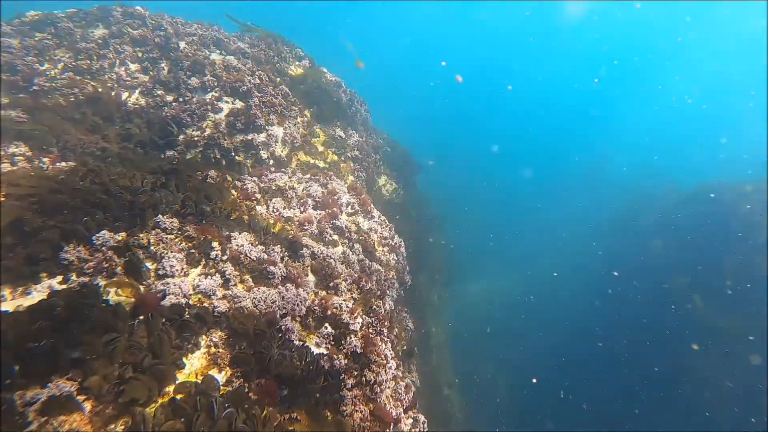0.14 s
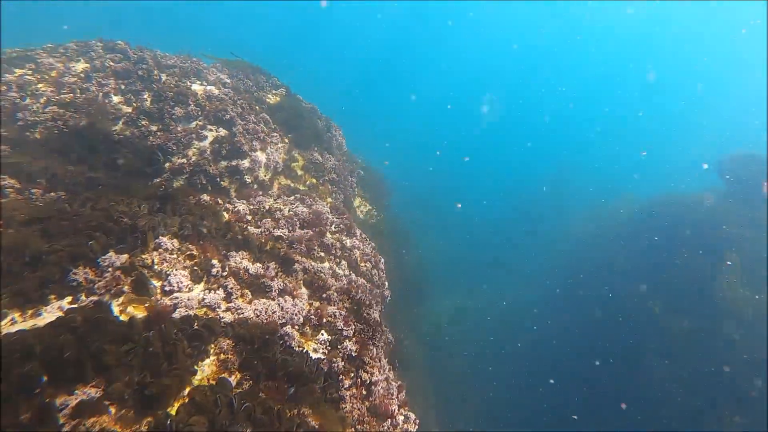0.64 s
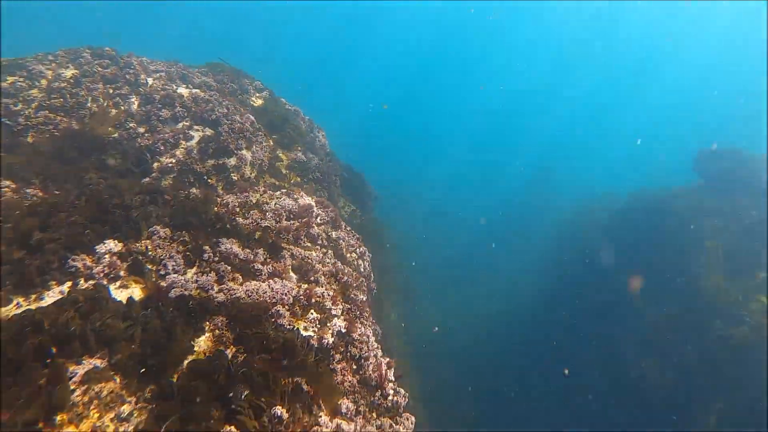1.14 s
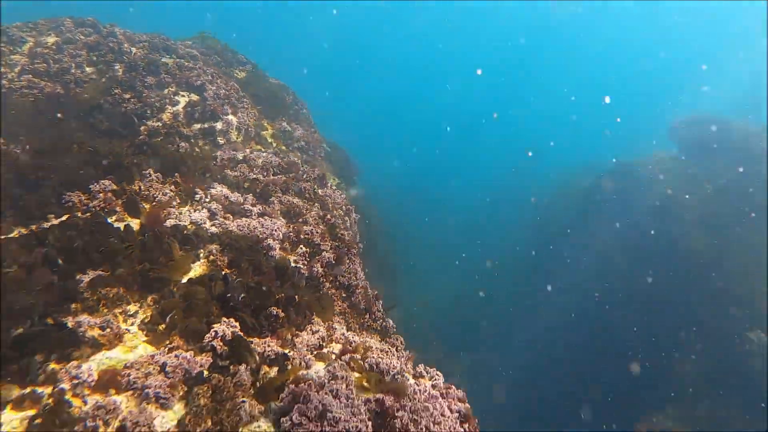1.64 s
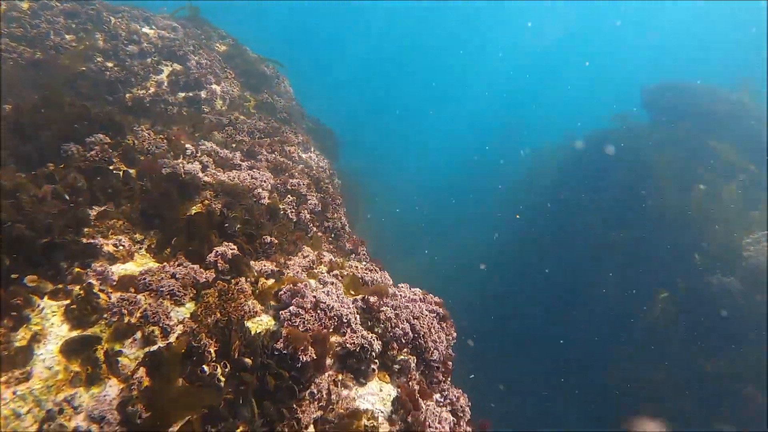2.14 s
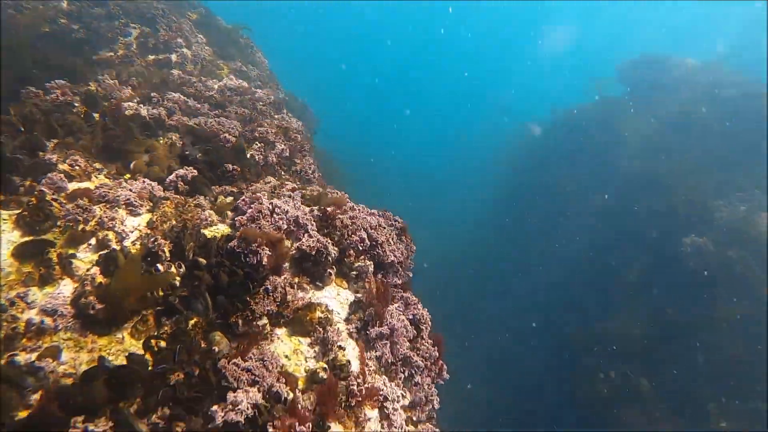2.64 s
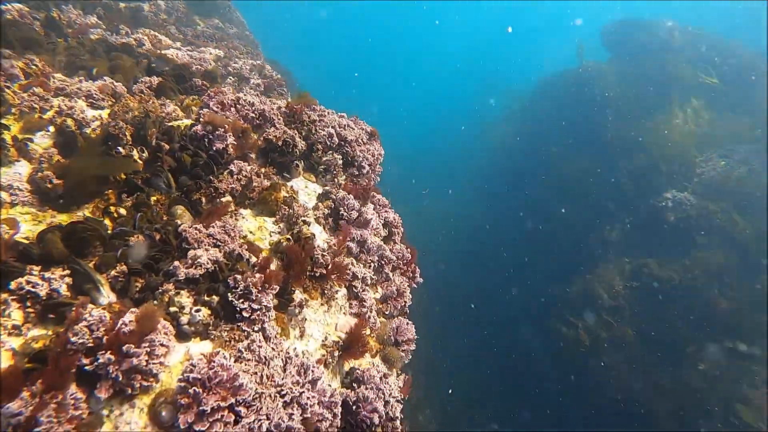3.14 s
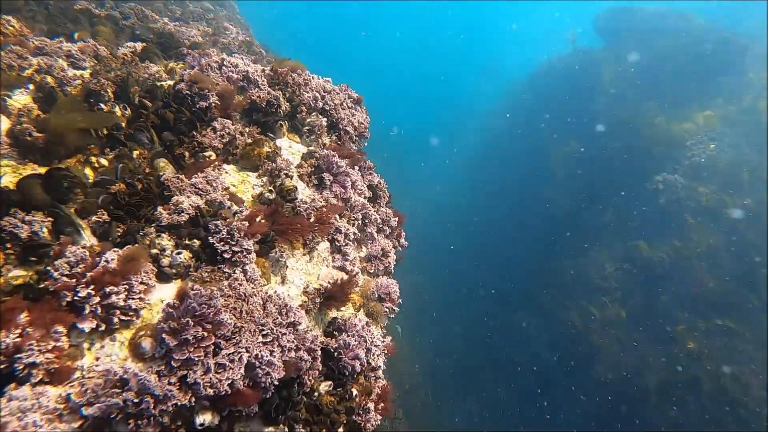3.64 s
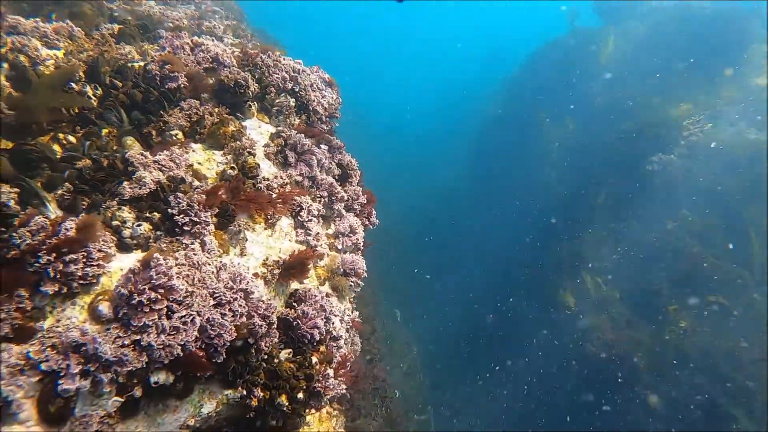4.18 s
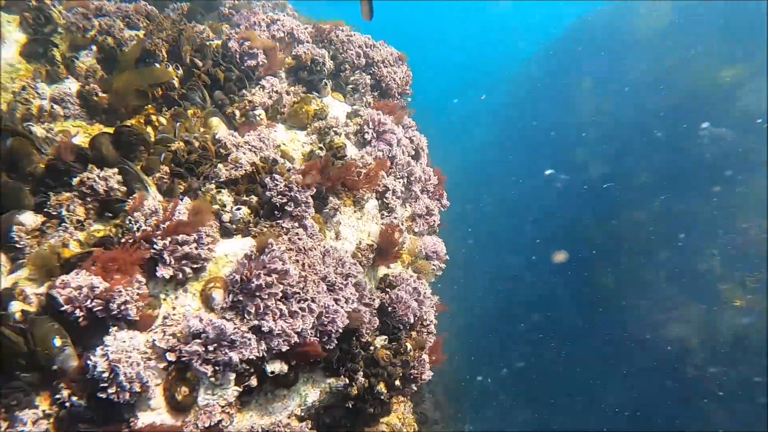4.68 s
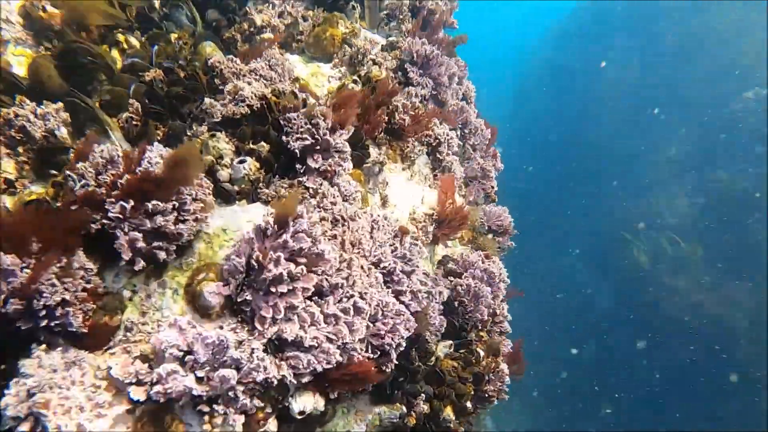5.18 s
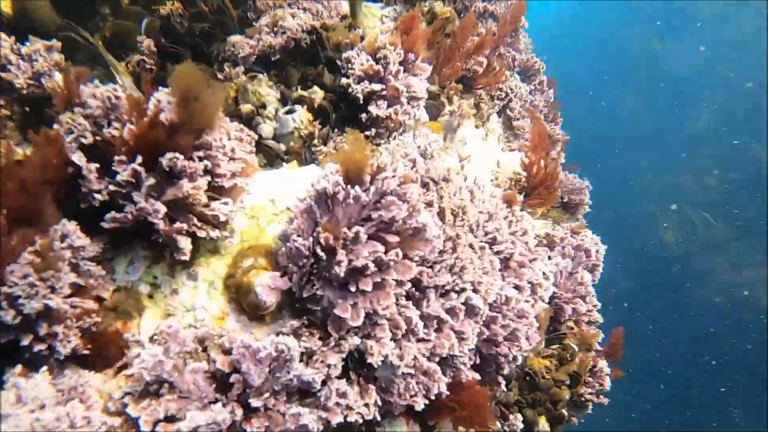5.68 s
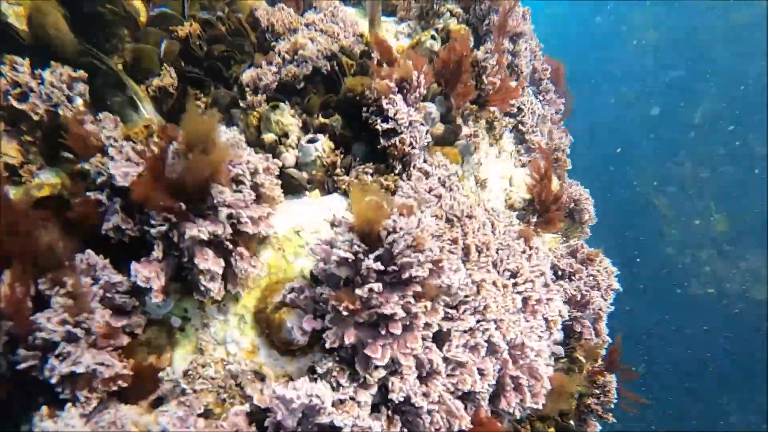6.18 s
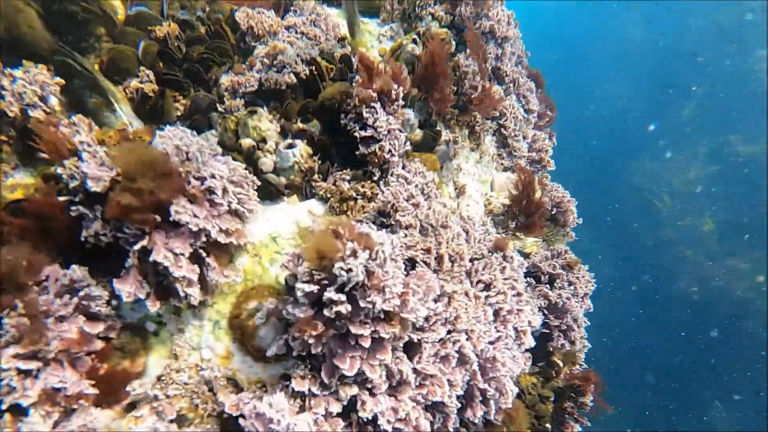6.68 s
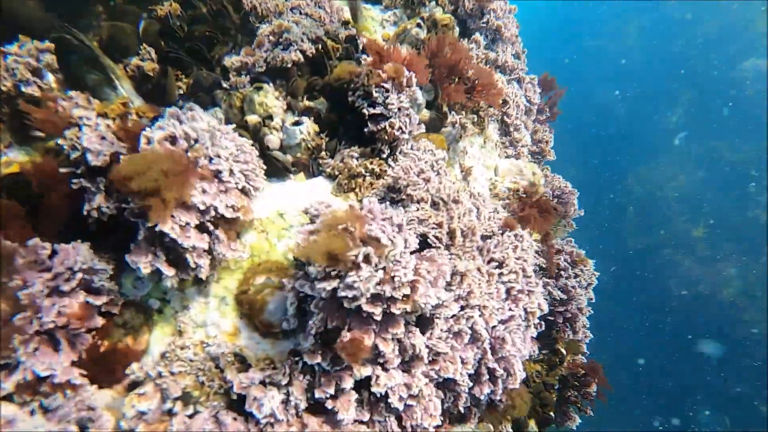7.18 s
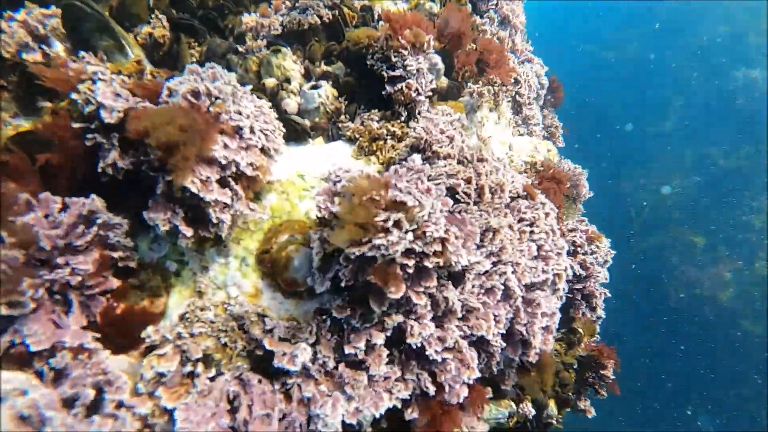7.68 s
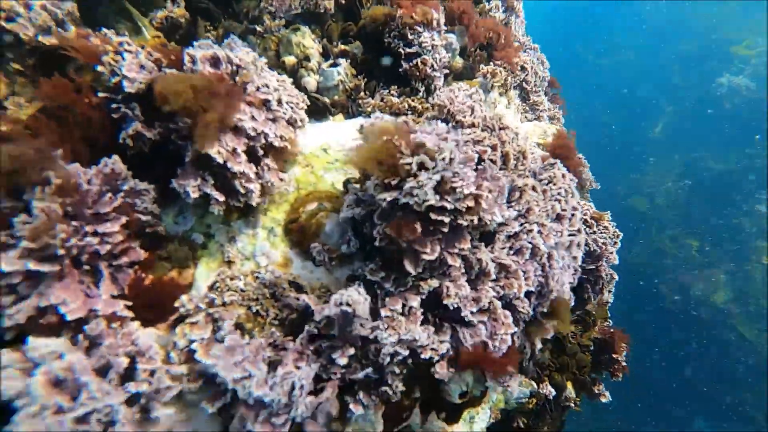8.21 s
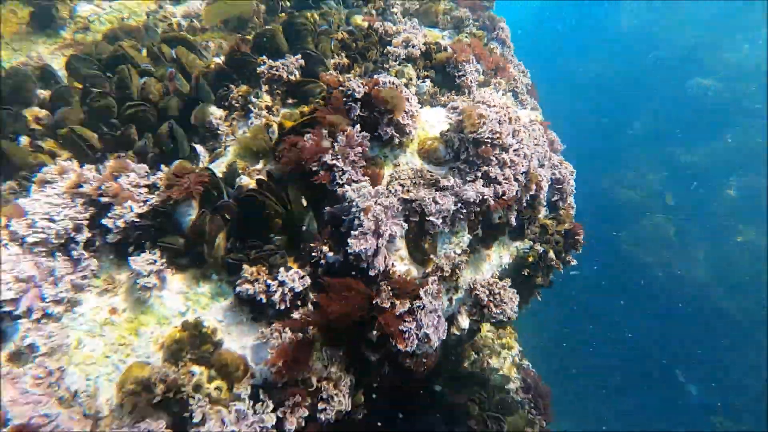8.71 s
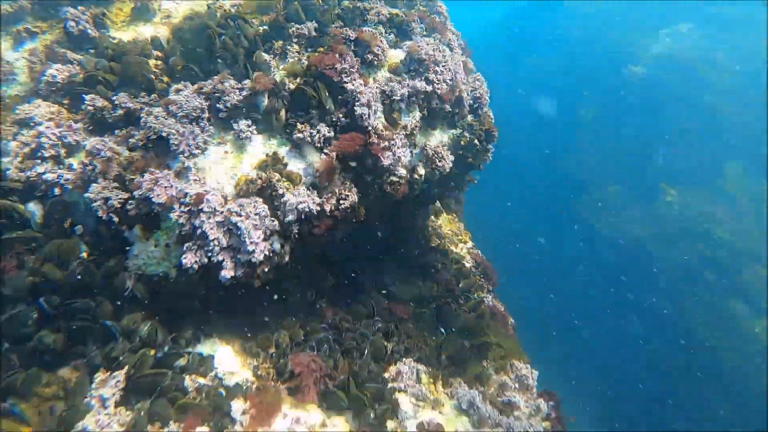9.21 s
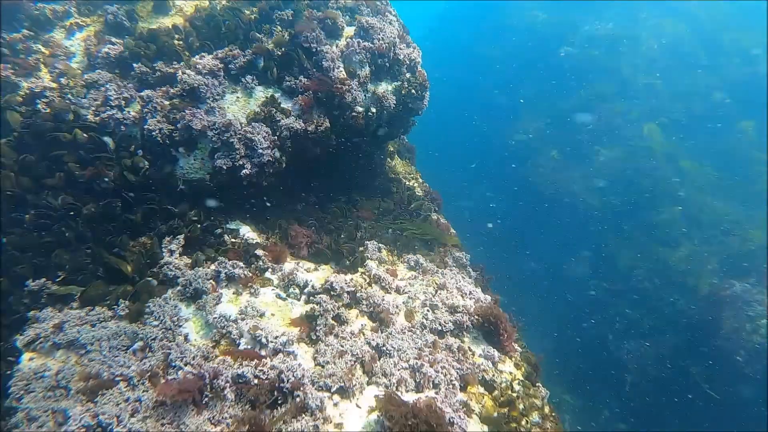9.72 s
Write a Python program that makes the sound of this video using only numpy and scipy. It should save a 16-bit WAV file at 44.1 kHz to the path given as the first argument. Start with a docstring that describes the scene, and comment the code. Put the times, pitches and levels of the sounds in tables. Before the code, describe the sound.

A small sealed camera on a pole moves along a seaweed-covered reef. Its internal microphones hear muffled water rush, faint crackle and a very low pole hum. Bubbles wobble at the start, a hard knock and boomy thud land soon after one second, then it quietens. Lighter bumps precede a violent cluster near six seconds; after a lull, another burst strikes past eight, then small taps.

```python
"""On a reef under water: a small sealed camera on a pole, its two microphones inside the hollow housing.
The pole hums and shudders very low as filtered noise and a wandering tone; water, bubbles, reef crackle and
dragging are noise forces that ring the housing's modes. Snaps nearby and free bubbles are fading tones.
At the housing itself, creaks lead into rattling knocks, and the mount thuds with sagging pitch.
The stereo picture narrows and opens as the camera fades between two microphones and one."""
import sys
import numpy as np
from scipy import signal
from scipy.io import wavfile
from scipy.ndimage import uniform_filter1d

SR = 44100
rng = np.random.default_rng(int(sys.argv[2]) if len(sys.argv) > 2 else 0)


def inscribe(sig):
    """Save sig as 16-bit PCM at rate SR to the path in sys.argv[1].

    A 1-D sig is mono; a 2-D sig holds one channel per row.
    Samples are clipped to [-1, 1] before scaling.
    """
    pcm = np.round(np.clip(np.atleast_2d(sig).T, -1, 1) * 32767)
    wavfile.write(sys.argv[1], SR, pcm.astype(np.int16))


def natural_amplitude(level_db):
    """Convert a level in decibels to a linear amplitude factor, elementwise."""
    exponent = np.asarray(level_db, float) / 20
    return 10 ** exponent


N = 433944
RING_S = 0.12  # length of a housing response, s
WOBBLE = 0.042  # unsteadiness of thud and bubble pitches, share


def along(table):
    """Each column of a curve table, interpolated sample by sample."""
    s, *columns = np.transpose(table)
    return [np.interp(np.arange(N) / SR, s, column) for column in columns]


def unit(x):
    """Scale to rms 1."""
    return x / np.sqrt(np.mean(x ** 2))


def walk(rate):
    """Random levels held 1 / rate s and smoothed twice; rms 1."""
    hold = int(SR / rate)
    steps = np.repeat(rng.standard_normal(N // hold + 1), hold)
    smooth = uniform_filter1d(uniform_filter1d(steps, hold), hold)
    return unit(smooth[:N])


def bandpass(x, order, edges_hz):
    """Keep the band between two edges in Hz."""
    return signal.sosfilt(signal.butter(order, edges_hz, "bandpass", fs=SR, output="sos"), x)


# The pole's first bending mode: t/s, f/Hz, level/dB (rms, before flutter)
POLE_SWAY = [(0.0, 23.87, -47), (0.74, 23.47, -41), (0.98, 22.15, -57), (1.23, 23.57, -29),
             (1.6, 23.52, -29.5), (1.82, 23.56, -40.5), (1.94, 23.33, -21.5), (2.11, 22.08, -36),
             (2.4, 22.36, -39), (2.53, 24.42, -29), (2.75, 22.39, -41.5), (4.0, 22.06, -40.5),
             (4.16, 26.14, -34.5), (4.4, 27.08, -25), (4.56, 23.76, -31), (4.72, 23.54, -18.5),
             (5.0, 23.21, -23), (5.2, 26.2, -29.5), (5.37, 26.5, -25), (5.52, 25.47, -33.5),
             (5.78, 24.47, -22), (5.9, 22.47, -22), (6.2, 22.29, -17.5), (6.6, 21.93, -27),
             (7.2, 22.03, -46), (8.22, 22.22, -40.5), (8.33, 21.66, -25.5), (8.6, 22.57, -30.5),
             (8.78, 21.83, -47), (9.84, 22.9, -40)]
# Eddies at pole and housing: t/s, pole shudder level/dB, deep rumble level/dB, higher rumble level/dB
# (rms; the rumbles before flicker)
EDDIES = [(0.0, -50, -73, -61), (1.089, -53.5, -58, -55), (1.31, -46, -29.5, -35.5), (1.7, -47, -52, -58),
          (2.05, -31.5, -38, -43.5), (2.27, -45, -49.5, -49.5), (3.258, -49, -69.5, -75),
          (4.03, -41, -59, -68.5), (4.41, -24, -62, -48.5), (4.75, -33.5, -43.5, -46.5),
          (5.0, -29.5, -36.5, -58.5), (5.36, -28.5, -40.5, -62), (5.55, -34, -48, -52.5),
          (5.73, -24.5, -38.5, -57), (5.92, -33.5, -33.5, -30), (6.221, -34.5, -47.5, -59.5),
          (6.48, -45, -51, -60), (6.799, -43, -43.5, -46), (7.0, -50.5, -69, -59),
          (7.969, -54.5, -60, -69.5), (8.472, -33, -55, -51.5), (8.749, -46.5, -53, -63.5),
          (9.84, -49.5, -64.5, -47.5)]


def pole():
    """The first bending mode is a nearly pure tone; eddies shake both modes irregularly."""
    hz, db = along(POLE_SWAY)
    level = np.sqrt(2) * natural_amplitude(db + 2.2 * walk(9.8))
    sway = level * np.sin(2 * np.pi * np.cumsum(hz) / SR)
    eddies = bandpass(rng.standard_normal(N), 3, [19, 60])
    first = unit(signal.lfilter(*signal.iirpeak(25, 0.47, fs=SR), eddies))
    second = unit(signal.lfilter(*signal.iirpeak(47, 12.0, fs=SR), eddies))
    shudder = unit(0.57 * first + 3.1 * second + 2.6 * unit(eddies))
    return sway + natural_amplitude(along(EDDIES)[0]) * shudder


def water():
    """Eddies tumble round the housing: two bands of noise surge together, mostly alike at both microphones."""
    surge = walk(13)
    out = 0
    for db, edges_hz in zip(along(EDDIES)[1:], ((66, 117.0), (135, 228.0))):
        rumble = unit(bandpass(rng.standard_normal((2, N)), 2, edges_hz))
        flicker_db = 2.5 * surge + 2.5 * walk(20)
        mid_side_db = np.array([[0], [-12]])
        out = out + natural_amplitude(db + flicker_db + mid_side_db) * rumble
    return out


def ring(modes):
    """Responses to one tap: decaying sines of alternate sign that swell in, power set by each mode's dB."""
    t = np.arange(int(RING_S * SR)) / SR
    responses = []
    for k, (hz, width, db) in enumerate(modes):
        strength = (-1) ** k * natural_amplitude(db) * np.sqrt(width)
        swell = 1 - np.exp(-t * hz / 0.14)
        responses.append(strength * np.exp(-np.pi * width * t) * np.sin(2 * np.pi * hz * t) * swell)
    return np.array(responses)


# Housing modes heard alike at both microphones, low to high in four groups:
# f/Hz, width/Hz, level/dB (within the group)
HOLLOW_MODES = [(297, 229, -3), (415.3, 36.3, -3.5), (468, 51, -5), (575, 33.4, -1), (657.3, 37, -7.5),
                (753.7, 47.4, -8.5)]
BRIGHT_MODES = [(1044, 190, -4), (1300, 72, -3.5), (1435, 75, -4), (1650, 132, -0.5)]
UPPER_MODES = [(2104, 460, -1), (2675, 150, -3.5), (2883, 230, -0.5), (3405, 480, -6)]
TOP_MODES = [(3860, 1200, 3.5), (4780, 330, -2.5), (5760, 1100, -0.5), (6700, 500, -19)]
# Modes that push the microphones in opposition, one list per group:
# f/Hz, width/Hz, level/dB (re a 100 Hz wide mode at the group's first f)
OPPOSED_MODES = [
    [(230, 100, -20), (450, 230, 0), (730, 180, -8.5)],
    [(1080, 160, 4.5), (1500, 300, -17)],
    [(1990, 250, 2.5), (2800, 250, 4.5)],
    [(4200, 500, 0.5), (5900, 600, -6.5)],
]


def housing():
    """For each group, one response per shared mode, scaled so their sum has energy 1, and one opposed response."""
    groups = (HOLLOW_MODES, BRIGHT_MODES, UPPER_MODES, TOP_MODES)
    body = []
    for shared, opposed in zip(groups, OPPOSED_MODES):
        reference = ring([(shared[0][0], 100, 0)])[0]
        modes = ring(shared)
        modes = modes / np.linalg.norm(modes.sum(axis=0))
        body.append((modes, ring(opposed).sum(axis=0) / np.linalg.norm(reference)))
    return body


def clicks(per_s, spread_db):
    """Scattered taps, a few much stronger than the rest."""
    out = np.zeros(N)
    count = int(per_s * N / SR)
    places = rng.integers(0, N, count)
    out[places] = natural_amplitude(spread_db * np.minimum(rng.exponential(size=count), 4.0))
    return out


def grains(per_s, spread_db, tail_s):
    """Envelope of short bursts that start at once and die away exponentially."""
    return unit(signal.lfilter([1], [1, -np.exp(-1 / (tail_s * SR))], clicks(per_s, spread_db)))


# Water rushing over the housing: t/s, hollow modes level/dB, upper modes level/dB
# (drive, before trim and gusts)
WATER_RUSH = [(0.0, -38, -66.5), (0.96, -48, -67), (1.31, -32, -75), (1.67, -46.5, -73), (2.3, -47, -72),
              (2.9, -51, -74.5), (3.94, -52.5, -71), (4.38, -45.5, -69.5), (5.51, -47, -71),
              (5.89, -34, -69.5), (6.08, -54.5, -82.5), (6.52, -60, -80.5), (6.71, -60, -74),
              (7.15, -53.5, -78.5), (7.89, -49, -76.5), (8.3, -41, -69.5), (8.58, -55.5, -79.5),
              (9.84, -41.5, -69)]


def flow_levels():
    """Drive levels of the four groups: bright blends hollow and upper; top swings wider than upper."""
    hollow, upper = along(WATER_RUSH)
    bright = hollow + 0.53 * (upper - hollow) - 3
    top = 1.258 * upper + 12.5
    return hollow, bright, upper, top


def rush(body):
    """Turbulence, bubbles, reef crackle and dragging force the housing's modes with noise."""
    reef = grains(15.0, 3.0, 0.003)
    gust = walk(6.5)
    t = np.arange(int(RING_S * SR)) / SR
    # one value per group, dB: crackle, bubbles, swirl depth
    crackle_db, bubble_db = (-18.5, -15.5, -12, -9.5), (-3.5, -5.5, -4, -5)
    swirl_db = (2.8, 2.5, 1.2, 1.4)
    out = np.zeros((2, N))
    groups = zip(body, flow_levels(), scrapes(), crackle_db, bubble_db, swirl_db)
    for (modes, opposed), db, drag, group_crackle_db, group_bubble_db, group_swirl_db in groups:
        flow, other_flow = rng.standard_normal((2, N))
        crackle = reef + grains(20.0, 3.5, 0.004)
        common = natural_amplitude(0.83 * gust + 2.1 * walk(18)) + natural_amplitude(group_crackle_db) * crackle
        for rank, mode in enumerate(modes):
            bubbles = grains(35.0, 3.0, 0.006)
            # swirls wander over the shell and favour now one mode, now another
            swirl = natural_amplitude(db - 5.5 + group_swirl_db * walk(7))
            force = swirl * (common + natural_amplitude(group_bubble_db) * bubbles)
            # a broad, soft contact drives the lower modes of a group harder
            force = force + drag * natural_amplitude(-2.5 - 0.5 * rank)
            # water pushes softly, so each mode swells in and the gaps between modes stay dark
            soft = mode * (1 - np.exp(-t / 0.0004))
            soft = soft * np.linalg.norm(mode) / np.linalg.norm(soft)
            out[0] += signal.oaconvolve(flow * force, soft)[:N]
        # the group's last force also drives its opposed modes
        out[1] += signal.oaconvolve(other_flow * force, opposed)[:N]
    return out


# Large bubbles wobbling free of the housing: t/s, level/dB (before swell and flutter),
# f/Hz (at the start, before wobble), fade by 60 dB/s (before flutter)
FREE_BUBBLES = [(0.0, -21.5, 411, 0.076), (0.012, -35, 546, 0.17), (0.135, -25.5, 565, 0.12),
                (0.81, -35, 297, 0.13), (2.211, -30.5, 430, 0.13), (2.74, -41, 544, 0.086),
                (3.265, -35, 293, 0.36), (3.29, -37, 544, .15)]


def bubbles_free():
    """Soft, unsteady tones swell in, rise a little in pitch and die."""
    out = np.zeros(N + SR)
    t = np.arange(SR) / SR
    for s, db, hz, t60 in FREE_BUBBLES:
        pitch = hz * (1 + 0.28 * t + WOBBLE * walk(50)[:SR])
        fade = natural_amplitude(db - 60 * t / t60 + 3.5 * walk(40)[:SR])
        swell = 1 - np.exp(-t / 0.0081)
        start = int(s * SR)
        out[start:start + SR] += np.sin(2 * np.pi * np.cumsum(pitch) / SR) * fade * swell
    return out[:N]


# Reef animals snapping nearby, each at its own pitch: t/s, level/dB (before swell), f/Hz
REEF_SNAPS = [(0.1082, -42, 4200), (0.268, -45, 6900), (0.6594, -30, 4920), (0.7776, -45, 3000),
              (0.8081, -41, 5540), (0.991, -44, 3570), (1.2905, -42, 2600), (1.8088, -47, 2660),
              (2.972, -49, 4600), (3.261, -49, 3060), (3.548, -48, 3000), (3.768, -46, 2820),
              (4.2782, -42.5, 4710), (5.1013, -46.5, 2850), (4.911, -49, 5200), (5.1307, -42, 2800),
              (5.1422, -42, 5320), (5.4615, -48, 3200), (5.7105, -45, 4300), (6.98, -50, 5230),
              (7.218, -53, 2970), (7.578, -54, 4800), (7.655, -56, 4650), (7.77, -57, 5300),
              (8.952, -50, 3030), (9.1232, -48, 2920), (9.679, -47, 4300), (9.8106, -46, 3400)]


def snaps():
    """A roughened tone at the snap's pitch and a faint noise crack fade by 60 dB in 31 cycles."""
    out = np.zeros(N + SR)
    t = np.arange(int(RING_S * SR)) / SR
    grits = rng.standard_normal((len(REEF_SNAPS), len(t)))
    for (s, db, hz), grit in zip(REEF_SNAPS, grits):
        crack = unit(bandpass(grit, 1, [1500, 6000]))
        roughness = 0.44 * uniform_filter1d(grit, size=20) * np.sqrt(20)
        tone = np.sin(2 * np.pi * hz * t) * (1 + roughness)
        envelope = natural_amplitude(db - 60 * t * hz / 31) * (1 - np.exp(-t / 0.00069))
        start = int(s * SR)
        out[start:start + len(t)] += (tone + natural_amplitude(-14) * crack) * envelope
    return out[:N]


# Knocks on the housing: t/s (contact 2.957 ms sooner), hollow modes peak level/dB,
# bright modes level/dB re hollow, upper modes level/dB re hollow
HOUSING_KNOCKS = [(0.109, -40, -2.5, -13), (0.189, -28.5, -24, -54), (0.309, -39, -36, -1),
                  (0.562, -30.5, -30, -46), (0.659, -41, 0, -1), (0.808, -45, -31, -10),
                  (0.903, -17, -4, -3), (1.076, -18, -33, -41), (1.323, -8.5, -16, -33),
                  (1.376, -22.5, -13.5, -50), (1.505, -22, -16.5, -24), (1.987, -29.5, -12, -42),
                  (2.074, -21.5, -8, -25.5), (2.29, -30.5, -13.5, -41), (2.438, -26.5, -12.5, -32),
                  (2.679, -42, -15, -8), (2.742, -39.5, -12, -27), (2.855, -59, -21, 5),
                  (3.181, -37.5, -8.5, -11), (4.103, -28.5, -18, -43), (4.279, -28.5, -18, -30),
                  (4.346, -25.5, -17.5, -50), (4.451, -19, -11.5, -55), (5.149, -37, -13.5, -10.5),
                  (5.606, -34.5, -16, -31), (5.755, -3, -8, -29), (5.801, -13, -32.5, -38.5),
                  (5.85, -17, -20.5, -36.5), (5.877, -10, -15.5, -48), (5.935, -13, -17, -28.5),
                  (6.029, -13.5, -48, -24), (8.13, -35, -12, -11.5), (8.159, -32.5, -9.5, -14),
                  (8.334, -8.5, -13.5, -48), (8.358, -3, -38.5, -43), (8.437, -16, -11.5, -27),
                  (9.229, -31, -11.5, -46), (9.359, -23.5, -14, -35), (9.717, -24.5, -21, -47)]


def knocks(body):
    """A creak swells into a blow and rattles through the modes; the hollow group is driven longest."""
    out = np.zeros((2, N + SR))
    lead = RING_S / 4  # room for the creak, s
    t = np.arange(int(RING_S * SR)) / SR - lead
    rattle_t60_s = (0.049, 0.04, 0.03, 0.034)  # the force fades by 60 dB, per group
    grits = rng.standard_normal((len(HOUSING_KNOCKS), len(t)))
    for (s, db, bright_db, upper_db), grit in zip(HOUSING_KNOCKS, grits):
        creak = 0.23 * rng.random()
        top_db = 0.94 * upper_db - 8.5
        levels_db = db + np.array([0, bright_db, upper_db, top_db])
        start = int((s - 0.002957 - lead) * SR)
        for (modes, opposed), group_db, t60 in zip(body, levels_db, rattle_t60_s):
            rattle = natural_amplitude(-60 * np.maximum(t, 0) / t60)
            force = grit * np.where(t < 0, creak * np.exp(t / 0.0038), rattle)
            force[len(t) // 4] += 4.0  # sharp tick of the contact
            # every blow lands elsewhere and weighs the modes anew
            weighed = natural_amplitude(3.0 * grit[:len(modes)]) @ modes
            sound = signal.fftconvolve(force[None], np.array([weighed, opposed]), axes=1)
            out[:, start:start + sound.shape[1]] += natural_amplitude(group_db) * sound / np.abs(sound[0]).max()
    return out[:, :N]


# The mount seating itself: t/s, level/dB (of the blow, before mode levels, swell and flutter),
# main mode f/Hz (settled, before wobble), main mode fade by 60 dB/s (before flutter), overtones level/dB
MOUNT_THUDS = [(0.905, -28, 182, 0.062, -18), (1.327, -5, 105, 0.2, -5.5), (1.385, -24, 115, 0.074, -8.5),
               (2.475, -17.5, 103.6, 0.15, -8), (4.272, -27, 110.4, 0.15, -4.5),
               (4.405, -28, 110.6, 0.13, -3.5), (4.706, -34, 89, 0.12, -7), (4.9, -28, 90.6, 0.23, -26),
               (5.029, -21, 89, 0.077, -21), (5.753, -5, 110.7, 0.058, 0), (5.884, -9, 151, 0.14, -12.5),
               (5.938, -6, 141, 0.075, -7), (6.029, -6, 139.7, 0.12, -2), (8.311, -17.5, 59.6, 0.069, -24),
               (8.335, -9.5, 109.7, 0.14, 0), (8.36, -8, 145, 0.11, -5), (8.388, -19, 215.7, 0.24, -19),
               (8.435, -13.5, 115.8, 0.13, -2.5), (8.458, -18, 48.6, 0.47, -17),
               (8.986, -28, 114, 0.094, -2)]
# Modes of the mount: f ratio to the main mode, level/dB re the blow, pitch excess at the blow (share),
# fade time ratio to the main mode, factor on the blow's overtone level/dB
MOUNT_MODES = [(.44, 0.5, 0.3, 0.36, 0), (1, 1.5, 0.095, 1.0, 0), (1.9, 4, 0.15, 1, 2),
               (3.6, -1, 0.044, 0.15, 1)]


def thuds():
    """Each blow rings the mount's modes and churns the water; pitch sags as the mount seats itself."""
    out = np.zeros(N + SR)
    t = np.arange(SR) / SR
    grits = rng.standard_normal((len(MOUNT_THUDS), SR))
    for (s, db, main_hz, t60, over_db), grit in zip(MOUNT_THUDS, grits):
        at = slice(int(s * SR), int(s * SR) + len(t))
        churn = unit(bandpass(grit, 2, [0.55 * main_hz, 1.43 * main_hz]))
        out[at] += churn * natural_amplitude(db - 10.5 - 60 * t / (t60 * 1.37)) * (1 - np.exp(-t / 0.0024))
        for ratio, mode_db, excess, lasts, share in MOUNT_MODES:
            sag = excess * np.exp(-t / (0.14 * t60 * lasts))
            hz = ratio * main_hz * (1 + sag + WOBBLE * walk(50)[:SR])
            level_db = db + mode_db + share * over_db
            fade = natural_amplitude(level_db - 60 * t / (t60 * lasts) + 2.3 * walk(60)[:SR])
            swell = 1 - np.exp(-t * ratio * main_hz / 0.35)  # time constant of 0.35 cycles
            out[at] += np.sin(2 * np.pi * np.cumsum(hz) / SR) * fade * swell
    return out[:N]


# Something drags or swirls over the housing: start t/s, end t/s (a short release follows),
# hollow, bright, upper and top modes level/dB (drive, before jerks and mode weights)
DRAGGING = [(1.04, 1.32, -39.5, -56, -65, -86), (1.828, 1.999, -53.5, -52.5, -69, -93),
            (2.285, 2.485, -49, -61, -69.5, -88), (3.212, 3.32, -48.5, -78, -94, -99),
            (5.717, 5.753, -15.5, -22, -35, -63), (5.773, 5.805, -18, -40, -53, -72),
            (5.84, 5.879, -19, -39, -56.5, -80), (5.886, 5.94, -22, -44.5, -59.5, -81),
            (6.01, 6.034, -22.5, -37.5, -56, -76), (6.475, 6.695, -52.5, -70, -80, -99),
            (6.64, 6.889, -44.5, -62.5, -74, -97), (8.299, 8.378, -13.5, -24, -41.5, -57.5),
            (8.453, 8.5, -48, -65, -78, -94.5)]


def scrapes():
    """Force of the dragging on each group of modes, slipping in jerks."""
    t = np.arange(N) / SR
    out = np.zeros((4, N))
    for start, end, *group_db in DRAGGING:
        length = end - start
        press = (t - start) / (0.45 * length)
        release = (end - t) / (0.003 + 0.16 * length) + 1
        touch = np.clip(np.minimum(press, release), 0, 1) ** 2
        out += natural_amplitude(np.array(group_db))[:, None] * touch
    return out * natural_amplitude(4.0 * walk(150))


def scene():
    """Mid and side signals at the pair of microphones, turned into left and right."""
    body = housing()
    shell = water() + rush(body) + knocks(body)
    thud, sway = thuds(), pole()
    mid = shell[0] + thud + sway + snaps() + bubbles_free()
    # the left microphone sits nearer the wall that carries the low modes
    low_side = 0.28 * uniform_filter1d(shell[0], size=13)
    side = shell[1] + low_side + 0.15 * np.roll(thud, 40) + 0.03 * np.roll(sway, 300)
    return np.array([mid + side, mid - side])


def top_cut(x):
    """Nothing passes above the cut-off."""
    return signal.sosfilt(signal.butter(12, 13000, fs=SR, output="sos"), x)


# Stereo width as the camera fades between two microphones and one: t/s, side level/dB
STEREO_WIDTH = [(0, -5.5), (1.4, -1.5), (2.3, -31.5), (2.6, -73), (4.0, -51), (4.2, -18.5), (5.1, -7.5),
                (6.1, -7), (6.9, -45), (7.0, -84)]


def record(dry):
    """The side signal fades down and up, the microphones dull the treble and the loudest peaks round off."""
    mid = (dry[0] + dry[1]) / 2
    side = (dry[0] - dry[1]) / 2 * natural_amplitude(along(STEREO_WIDTH)[0])
    membrane = signal.butter(5, 7200, fs=SR, output="sos")  # low-pass, Hz
    dull = signal.sosfilt(membrane, np.array([mid + side, mid - side]))
    rounded = 1.05 * np.tanh(dull / 1.05)
    return top_cut(rounded)


dry = scene()
out = record(dry)
inscribe(out)
```